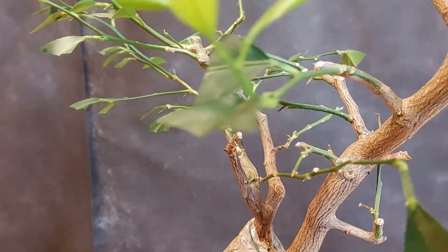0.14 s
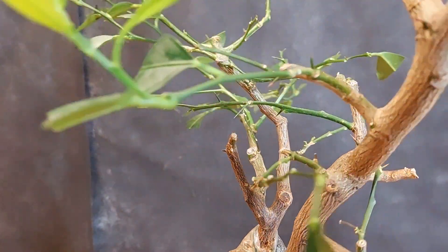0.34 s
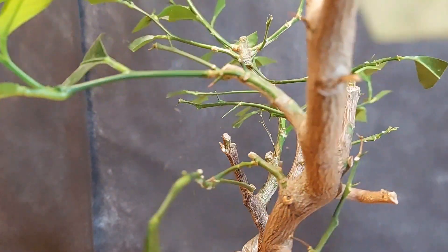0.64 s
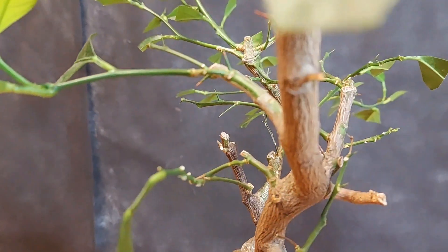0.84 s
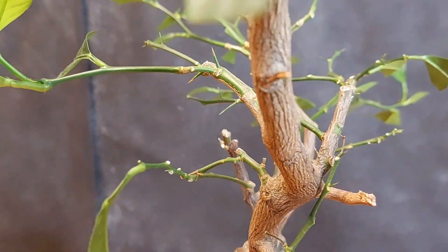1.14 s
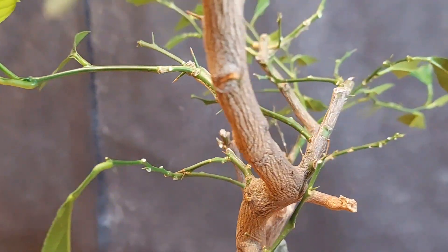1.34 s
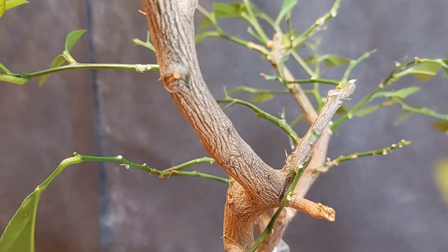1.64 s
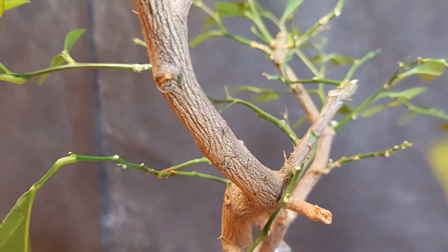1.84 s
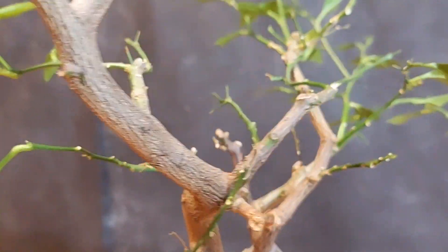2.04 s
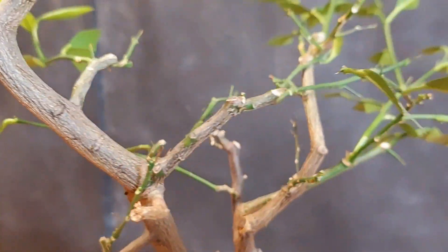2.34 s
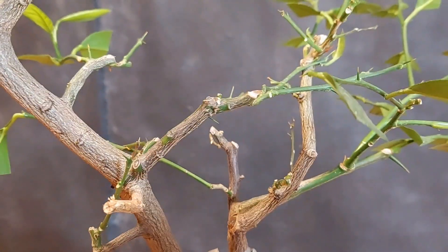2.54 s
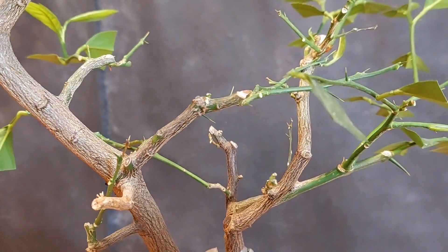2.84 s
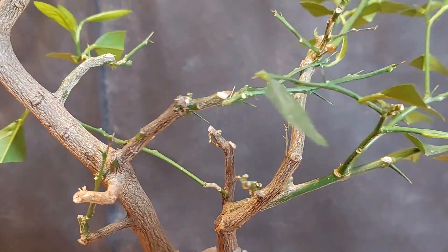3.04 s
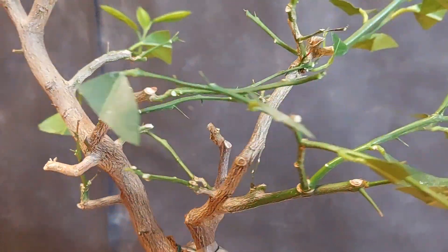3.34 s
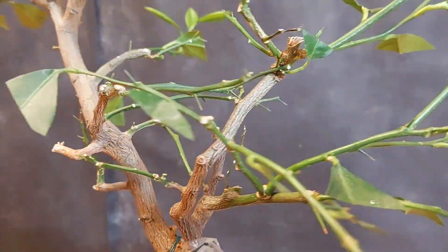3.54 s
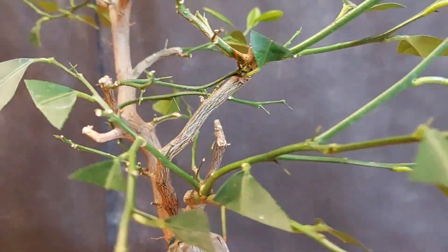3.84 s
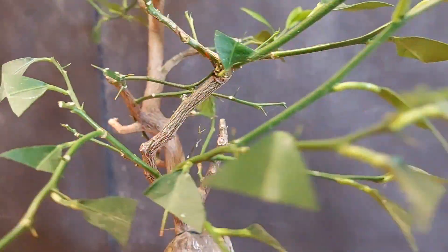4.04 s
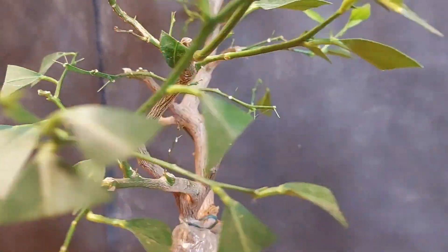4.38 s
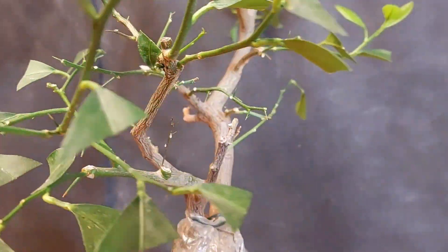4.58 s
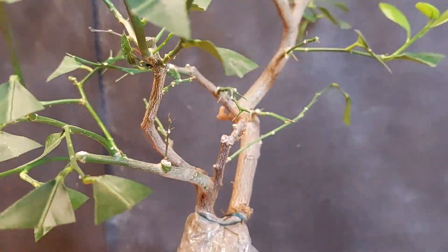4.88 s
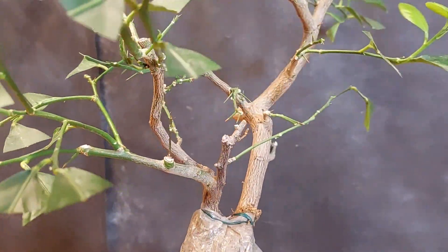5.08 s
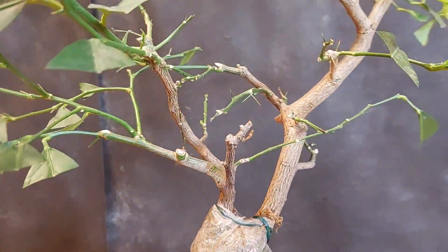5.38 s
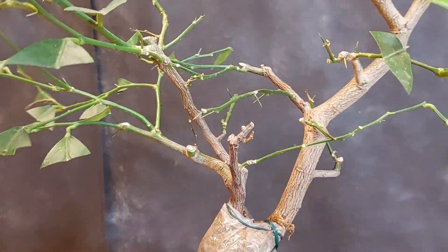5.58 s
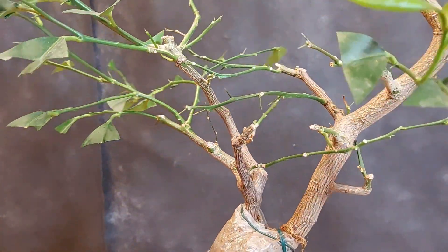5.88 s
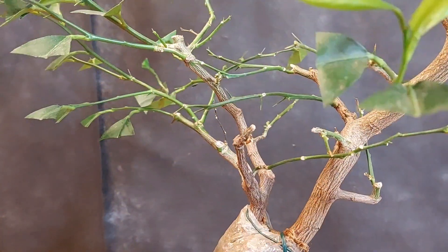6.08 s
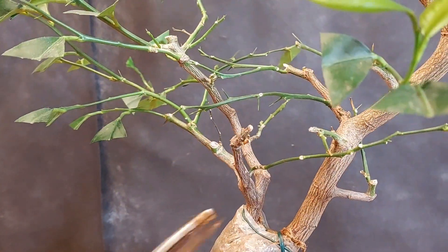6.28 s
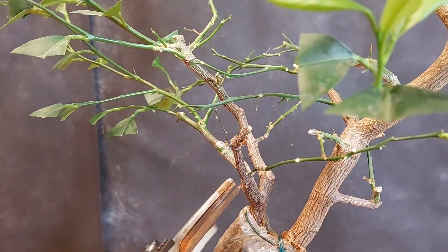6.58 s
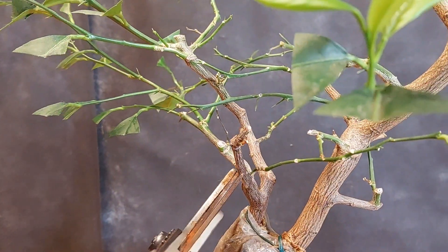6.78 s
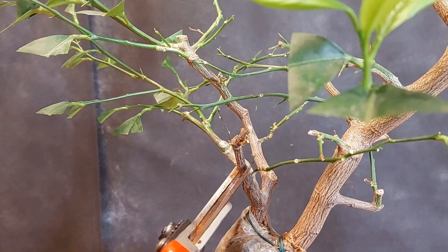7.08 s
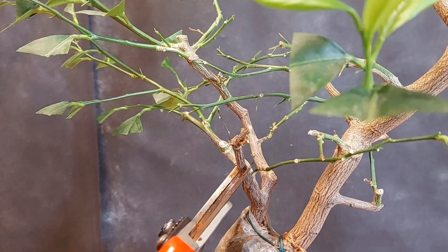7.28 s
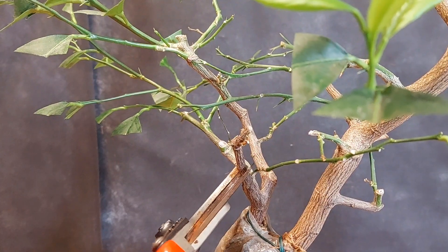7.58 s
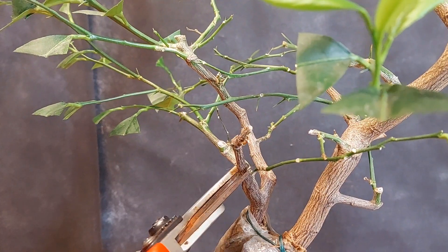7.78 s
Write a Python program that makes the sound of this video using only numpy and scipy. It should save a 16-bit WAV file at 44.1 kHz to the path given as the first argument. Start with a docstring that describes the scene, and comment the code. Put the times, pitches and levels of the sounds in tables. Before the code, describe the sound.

Close stereo microphone in a quiet, faintly hissing room. A small potted tree is turned by hand: dry leaf rustles and tiny ticks, then a sudden loud twig bump and scrape on the left. Sparse rustling follows, a tool knocks the table with a short woody clatter, and shears click open with a thin high ring. It ends on hiss and a faint low rumble.

```python
"""In a quiet room, close to a two-port microphone, a small potted tree is turned by hand.
Leaves and hand brush past as clumped, filtered noise; leaf edges and thorns tick as millisecond bursts.
A twig strikes and scrapes the left port, shaking the microphone body, and a tool knocks on the table,
ringing its modes. The latch of pruning shears snaps open with a thin steel ring of beating sines.
Behind them lie hiss and room tone, a throbbing hum and a passing rumble of resonant noise."""
import sys
import numpy as np
from scipy import signal
from scipy.fft import rfft, irfft
from scipy.io import wavfile
from scipy.ndimage import uniform_filter1d

SR = 44100
rng = np.random.default_rng(int(sys.argv[2]) if len(sys.argv) > 2 else 0)


def file_out(sig):
    """Save sig as 16-bit WAV at sys.argv[1]."""
    # one column per channel
    cols = np.atleast_2d(sig).T
    # limit, then scale
    lim = np.clip(cols, -1, 1)
    pcm = np.round(lim * 32767).astype(np.int16)
    wavfile.write(sys.argv[1], SR, pcm)


N = 349253


def amp(db):
    """Decibel law: a level in dB becomes an amplitude ratio."""
    return 10 ** (np.asarray(db) / 20)


def evened(x):
    """Power normalization: scales to unit root mean square."""
    return x / np.sqrt(np.mean(x ** 2) + 1e-20)


def smoothed(x, width):
    """Low-pass averaging: two running means in a row leave a slow random drift of unit power."""
    return evened(uniform_filter1d(uniform_filter1d(x, width), width))


def read(points, hz):
    """Logarithmic frequency scale: interpolates (frequency, value) points along it."""
    f, value = np.transpose(points)
    return np.interp(np.log(hz + 1), np.log(f + 1), value)


def sides(pan_db):
    """Interchannel level difference: left and right gains whose mean power is one."""
    left = amp(pan_db)
    return np.array([left, np.ones_like(left)]) * np.sqrt(2 / (1 + left ** 2))


def add(mix, s, sound):
    """Superposition: adds a two-channel sound from time s on, cut at the end."""
    part = mix[:, round(s * SR):][:, :sound.shape[1]]
    part += sound[:, :part.shape[1]]


def colour(x, points, tilt_db=0, peak_hz=5000, peak_db=0):
    """Spectral filtering: a curve, a tilt in dB per octave about 5 kHz and one broad peak."""
    hz = np.fft.rfftfreq(x.shape[-1], 1 / SR) + 1
    octaves_off_peak = np.log2(hz / peak_hz)
    peak = peak_db * np.exp(-(octaves_off_peak / 0.37) ** 2)
    gain_db = read(points, hz) + tilt_db * np.log2(hz / 5000) + peak
    return irfft(rfft(x) * amp(gain_db), x.shape[-1])


def band(x, lo_hz, hi_hz):
    """Band-pass filtering: keeps one frequency range, at unit power."""
    sos = signal.butter(4, [lo_hz, hi_hz], "band", fs=SR, output="sos")
    return evened(signal.sosfilt(sos, x))


def resonate(x, hz, width):
    """Damped resonance: a two-pole resonator of given bandwidth in Hz, at unit power."""
    r = np.exp(-np.pi * width / SR)
    return evened(signal.lfilter([1], [1, -2 * r * np.cos(2 * np.pi * hz / SR), r * r], x))


def rings(modes, seconds, phase=0):
    """Modal superposition: sines that each die by 60 dB in their t60; phase in cycles."""
    hz, db, t60 = np.transpose(modes)[:, :, None]
    t = np.arange(round(seconds * SR)) / SR
    decay = amp(db - 60 * t / t60)
    return (decay * np.sin(2 * np.pi * (hz * t + phase))).sum(0)


def swell(rise, fall):
    """Envelope of growth and decay: a bell-shaped rise, then 20 dB lost per fall time."""
    t = np.arange(-3 * rise, 3 * fall, 1 / SR)  # the peak comes at three rise times
    return np.where(t < 0, np.exp(-2 * (t / rise) ** 2), amp(-20 * t / fall))


# spectrum of hiss and room tone: (frequency [Hz], relative level [dB per Hz])
AIR_SPECTRUM = [(13, -55.5), (22, -20.5), (80, -5), (95, -9), (115, -20.5), (223, -25), (387, -30),
                (420, -37), (482, -27), (524, -35), (690, -36.5), (2820, -49), (16000, -49.5)]
AIR_DB = -65.5  # overall level
# balance of the two ports: (frequency [Hz], left-right [dB])
AIR_BALANCE = [(60, 5.5), (240, 5), (950, 3.5), (3770, 0.5), (15000, -0.5)]


def air():
    """Uncorrelated noise: microphone hiss and room tone are unrelated in the two ports."""
    hz = np.fft.rfftfreq(N, 1 / SR)
    noise = evened(colour(rng.standard_normal((2, N)), AIR_SPECTRUM))
    return amp(AIR_DB) * irfft(rfft(noise) * sides(read(AIR_BALANCE, hz)), N)


# swells of low hum: (time of peak [s], level [dB])
HUM_SWELLS = [(.32, -59.5), (0.552, -58), (0.761, -52.5), (1.0, -57), (1.51, -50), (2.0, -52.5),
              (2.969, -56.5), (3.278, -63.5), (3.901, -59.5)]
HUM_HZ, HUM_RISE_S, HUM_FALL_S, HUM_PAN_DB = 78.6, 0.085, .09, 4.5


def hum():
    """Amplitude and frequency modulation: a low sine of wavering pitch throbs in separate swells."""
    out = np.zeros((2, N))
    waver = 1 + 0.054 * smoothed(rng.standard_normal(N), 3000)  # frequency ratio
    shape = swell(HUM_RISE_S, HUM_FALL_S)
    for s, db in HUM_SWELLS:
        start = s - 3 * HUM_RISE_S
        cycles = HUM_HZ * np.cumsum(waver[round(start * SR):][:len(shape)]) / SR
        add(out, start, amp(db) * shape * np.sin(2 * np.pi * cycles) * sides(HUM_PAN_DB)[:, None])
    return out


# resonances of the rumble: (frequency [Hz], width of the first of two resonators [Hz], relative level [dB])
RUMBLE_RESONANCES = [(158, 26, 0.5), (231, 46, 1.5), (285, 67, -4)]
# course of the rumble before its surges: (time [s], level [dB])
RUMBLE_COURSE = [(4.5, -81), (5.0, -70), (6.3, -70), (6.85, -62.5), (7.92, -71.5)]
SURGE_DB, SURGE_S = 2.5, .06  # rms depth, averaging time


def rumble():
    """Resonance under random excitation: partly shared noise through low resonators passes in surges."""
    noise = rng.standard_normal((3, N))
    ports = noise[:2] + 0.24 * noise[2]
    roar = np.zeros((2, N))
    for hz, width, db in RUMBLE_RESONANCES:
        roar += amp(db) * resonate(resonate(ports, hz, width), hz, 2 * width)
    surge = smoothed(rng.standard_normal(N), round(SURGE_S * SR))
    level_db = np.interp(np.arange(N) / SR, *np.transpose(RUMBLE_COURSE)) + SURGE_DB * surge
    return amp(level_db) * evened(roar) * sides(3.8)[:, None]


# a tool meets the table: (time [s], level [dB], left-right [dB], hardness tilt [dB per octave],
# hollow ring [dB], strongest frequency [Hz])
TOOL_KNOCKS = [(5.4046, -43, 5, -2.5, -40, 2170), (5.5994, -24.5, 4, 3, -21, 1600),
               (5.606, -25.5, 5, -1.7, -4.5, 1490), (5.617, -32, -16, 1.5, -1.5, 1280),
               (5.752, -55, 3.5, -12, 6.5, 700), (5.764, -49.5, 3, -8, 6.5, 700),
               (5.775, -54, -2.5, -1, -5, 1200)]
# table modes that stand out: (frequency [Hz], relative level [dB], t60 [s])
TABLE_MODES = [(282, -10, 0.098), (422, 7.5, 0.12), (537, 2, 0.039), (620, 11, 0.049), (1044, -1, 0.095),
               (1537, -14.5, 0.11)]
# table modes too dense to tell apart: (frequency [Hz], relative level [dB per Hz])
CLACK_SPECTRUM = [(500, -8), (900, -4.5), (1600, 0), (2300, -9), (3000, -10), (4200, -11), (5300, -17),
                  (6200, -46)]
CLACK_T60 = 0.21  # s


def knocks():
    """Modal density: chatter rings a few separate modes over a noisy clack of dense ones."""
    out, t = np.zeros((2, N)), np.arange(16384) / SR
    ring = rings(TABLE_MODES, .3)[None]
    for s, db, pan_db, hard_db, hollow_db, peak_hz in TOOL_KNOCKS:
        noise = rng.standard_normal((3, len(t)))
        shared = noise[:2] + .5 * noise[2]
        clack = evened(colour(shared, CLACK_SPECTRUM, hard_db, peak_hz, peak_db=10.0))
        clack *= amp(-60 * t / CLACK_T60) + 0.92 * np.exp(-t / 0.0093)
        chatter = shared * np.exp(-t / 0.016)
        chatter /= np.linalg.norm(chatter[0])
        hollow = signal.fftconvolve(chatter, ring, axes=1)[:, :len(t)]
        add(out, s, amp(db) * (clack + amp(hollow_db) * hollow) / 3 * sides(pan_db)[:, None])
    return out


# pushes on the microphone: (time [s], level [dB], left-right [dB], contact time [s])
PUSHES = [(.744, -38, -10, .002), (1.0125, -46, -5, .002), (1.528, -54, 3, .0012), (1.537, -50, 3, .0008),
          (2.1248, -28, 18, .0006), (2.1369, -12, 38, .0005), (2.1376, -9, 38, .0005),
          (2.1405, -11, 38, .0018), (2.1441, -10, 38, .0006), (2.1447, -11, 38, .0044),
          (3.845, -55, 1.5, .0012), (5.46, -58, 5, .02), (5.6, -48, 1.5, .003), (6.11, -51, 9, .004)]
# modes of the microphone body: (frequency [Hz], relative level [dB], t60 [s])
BODY_MODES = [(59.09, -16, 0.044), (91, -5, 0.11), (133, -4.5, .08), (281, -3.5, 0.052), (1610, 1, 0.0044),
              (3250, 12, 0.022)]
PRESS_S = .0019  # longer contacts press the capsule in, shorter ones flick it out


def jolts():
    """Impulse response: each push on the capsule is heard directly and shakes the body's modes."""
    out = np.zeros((2, N))
    response = rings(BODY_MODES, .3, phase=.2) * 330 / SR
    response[0] += 1  # the push itself
    for s, db, pan_db, contact in PUSHES:
        push = np.hanning(max(round(contact * SR), 3) + 2)
        direction = np.sign(contact - PRESS_S)
        add(out, s, direction * amp(db) * np.convolve(push, response) * sides(pan_db)[:, None])
    return out


# spectrum of a tick, snap or scrape: (frequency [Hz], relative level [dB per Hz])
TICK_SPECTRUM = [(300, -40.5), (1500, -9), (4000, -6.5), (7500, -1), (10000, -6.5), (13000, -1.5),
                 (16000, -10.5)]
SCRAPE_S, SCRAPE_DB, SCRAPE_HOLD_S, SCRAPE_FADE_S = 2.1453, -23.5, 0.003, 0.006  # 20 dB per fade time


def scrape():
    """Friction noise: a twig hisses across the left port, holds briefly and fades."""
    out = np.zeros((2, N))
    t = np.arange(0, SCRAPE_HOLD_S + 2 * SCRAPE_FADE_S, 1 / SR)
    hiss = evened(colour(rng.standard_normal((2, len(t))), TICK_SPECTRUM, -0.54))
    fade_db = 20 * np.maximum(t - SCRAPE_HOLD_S, 0) / SCRAPE_FADE_S
    add(out, SCRAPE_S, amp(SCRAPE_DB - fade_db) * hiss * sides(24.)[:, None])
    return out


TICK_S = .0009  # decay time constant
ROOM_DB, ROOM_T60 = -21.5, 0.018  # near reflections: level, t60 in s


def snap(peak_hz):
    """Impulsive release: a millisecond burst, its peak one, differing by port, and near reflections."""
    noise = rng.standard_normal((3, 4096))
    t = np.arange(noise.shape[1]) / SR
    shared = colour(noise[:2] + 0.57 * noise[2], TICK_SPECTRUM, peak_hz=peak_hz, peak_db=10)
    burst = shared * np.exp(-t / TICK_S) * (1 - np.exp(-t / 0.000083))
    tail = shared * amp(ROOM_DB - 60 * t / ROOM_T60) * (1 - np.exp(-t / 0.003))
    return (burst + tail) / abs(burst).max()


# steel of the shears: (frequency [Hz], level [dB], t60 [s])
STEEL_MODES = [(11840, -31, .1), (11940, -38, .12), (11780, -39, .12), (12290, -46, .1)]
LATCH_S, LATCH_DB = 6.1213, -19


def latch():
    """Beating of close modes: the latch snaps open and the steel rings thinly."""
    out = np.zeros((2, N))
    add(out, LATCH_S, amp(LATCH_DB) * snap(12300))
    left = rings(STEEL_MODES, .25)
    right = amp(-1.5) * rings(STEEL_MODES, .25, phase=0.21)
    add(out, LATCH_S, np.array([left, right]))
    return out


# leaf edges and thorns: (time [s], level [dB], left-right [dB], strongest frequency [Hz])
LEAF_TICKS = [(0.6757, -40.5, -12, 8460), (0.7342, -36, -5, 4870), (0.7439, -38, -26, 5270),
              (0.7546, -25.5, -3, 3740), (0.7933, -30.5, 1, 7900), (0.821, -46, -9, 5680),
              (1.012, -32.5, -15, 4940), (1.02, -40.5, -17, 2850), (1.5555, -44.5, 5, 8000),
              (1.59, -46, -23, 13600), (2.1249, -27.5, -8, 2628), (3.5534, -45, -1, 4995),
              (3.5682, -41, 6, 4850), (3.6297, -48, 6, 7400), (3.8559, -32, -4.5, 8000),
              (3.8735, -35, -6, 5700), (4.998, -31.5, -5, 6260), (5.1993, -44.5, 11.5, 7550),
              (5.413, -44.5, 5, 2220), (5.445, -44.5, -3, 2010), (5.551, -43, 2, 7200),
              (5.9339, -41, 0, 7300), (5.9653, -35.5, -5, 5080), (6.108, -38, 8, 11800),
              (6.1395, -31.5, 8, 11800), (6.2592, -35.5, 19.5, 6540), (6.3091, -40, 5, 8150),
              (6.329, -42, 15, 7560), (6.466, -40, 5, 5360)]


def ticks():
    """Stick-slip release: leaf edges and thorns catch and let go, one short burst each."""
    out = np.zeros((2, N))
    for s, db, pan_db, peak_hz in LEAF_TICKS:
        add(out, s, amp(db) * snap(peak_hz) * sides(pan_db)[:, None])
    return out


# leaves and hand brushing past: (time of swell peak [s], level [dB],
# brightness from dull rub to fizz [dB], fall time by 20 dB [s], strongest frequency [Hz])
BRUSH_STROKES = [(0.577, -81.5, 11, .039, 5500), (0.631, -71.5, 2.5, 0.052, 11200),
                 (0.674, -69, -5, 0.049, 4170), (0.721, -67, -11, 0.06, 700),
                 (0.751, -52.5, -6.5, .028, 3700), (0.791, -59.5, 0, .017, 2120),
                 (0.82, -60, -13.5, 0.029, 3000), (1.019, -59, -12, 0.036, 725),
                 (1.165, -79.5, 12, 0.061, 6300), (1.537, -67, -15.5, 0.076, 645),
                 (1.598, -70, 1, 0.019, 11000), (2.136, -38.5, -21, 0.029, 3040),
                 (2.142, -51, -15, 0.018, 2580), (2.517, -71, 8, .06, 4830), (2.995, -65, -1, 0.056, 1300),
                 (3.086, -90, 16, 0.043, 7000), (3.38, -86.5, 23.5, 0.095, 7900),
                 (3.527, -76, 7, .033, 5370), (3.574, -66.5, 5, 0.085, 4930),
                 (3.634, -66.5, 12, 0.021, 7300), (3.784, -87.5, 20, 0.066, 7460),
                 (3.856, -69.5, -4, 0.043, 900), (3.873, -64, 0, 0.039, 2200),
                 (3.967, -84.5, 23, 0.032, 8500), (4.19, -90.5, 20.5, 0.053, 8150),
                 (4.61, -82, 10, .1, 5000), (4.692, -61.5, -5.5, 0.18, 1680), (4.772, -57, 8, 0.07, 1400),
                 (4.955, -61.5, -3, .11, 7300), (5.004, -57.5, -2, 0.048, 1180),
                 (5.097, -87.5, 28, 0.097, 7900), (5.19, -70.5, -2.5, 0.16, 2050),
                 (5.274, -79, 6, 0.22, 7600), (5.43, -66.5, -20, 0.079, 1900),
                 (5.511, -67, -4.5, 0.15, 2500), (5.629, -50, -17, 0.064, 3740),
                 (5.772, -68.5, -8, 0.083, 1200), (5.93, -66, 0.5, 0.08, 3920),
                 (5.973, -71, -2, 0.085, 4480), (6.09, -69, 3, 0.036, 4200),
                 (6.114, -50.5, 23.5, 0.028, 4200), (6.138, -58.5, 13.5, 0.067, 2400),
                 (6.26, -68.5, 10, 0.061, 4190), (6.327, -69.5, 0, 0.14, 3800), (6.461, -72.5, 4, .1, 4670),
                 (6.502, -82.5, -13, 0.16, 650), (7.888, -82.5, -6, 0.19, 8700)]
# spectrum of leaf slips: (frequency [Hz], relative level [dB per Hz])
LEAF_SPECTRUM = [(1650, -35.5), (2800, -13.5), (3150, -12.5), (5520, -6.5), (7120, -3), (9400, -14.5),
                 (10600, -13), (14800, -12), (16000, -14)]
# spectrum of the dull rub: (frequency [Hz], relative level [dB per Hz])
RUB_SPECTRUM = [(350, -4.5), (700, -2), (1200, -4), (2000, -2), (2800, -4)]
# where the brushing is: (time [s], left-right [dB])
BRUSH_PLACE = [(.58, -18), (.8, 0.5), (1.998, 3), (2.13, 15), (2.2, 1), (3.701, 0.5), (4.0, 2), (6.201, 2),
               (6.549, 8)]
RISE_S, RISE_SHARE = 0.0045, 0.33  # a brush rises in this time plus this share of its fall time
FIZZ_DB, RUB_DB, FIZZ_SHARE = 1.5, -2, 0.45  # brightness lifts fizz by this share, lowers rub by the rest
BRUSH_PEAK_DB = 6  # how far the strongest pitch of a brush stands out


def brushes():
    """Friction as many small slips: slips of uneven size, in clumps, fill one swell per brush."""
    clumps = amp(2.0 * evened(uniform_filter1d(rng.standard_normal(N), size=180)))
    slips = rng.standard_normal((2, N)) * amp(1.5 * rng.exponential(1, N)) * clumps
    leaf = colour(slips, LEAF_SPECTRUM)
    swish = band(leaf, 2600, 6000)
    fizz = band(leaf, 7100, 16500)
    rub = band(colour(slips, RUB_SPECTRUM), 300, 2400)
    out = np.zeros((2, N))
    for s, db, bright_db, length, peak_hz in BRUSH_STROKES:
        rise = RISE_S + RISE_SHARE * length
        shape, start = amp(db) * swell(rise, length), s - 3 * rise
        first = round(start * SR)
        span = np.s_[:, first:first + len(shape)]
        mix = swish[span] + amp(FIZZ_DB + FIZZ_SHARE * bright_db) * fizz[span]
        mix += amp(RUB_DB - (1 - FIZZ_SHARE) * bright_db) * rub[span]
        mix = colour(mix, [(1, 0.00054)], peak_hz=peak_hz, peak_db=BRUSH_PEAK_DB)  # all but flat below the peak
        add(out, start, mix * shape[:mix.shape[1]])
    return out * sides(np.interp(np.arange(N) / SR, *np.transpose(BRUSH_PLACE)))


def scene():
    """Linear superposition: the sound pressures of all sources add."""
    background = air() + hum() + rumble()
    return background + knocks() + jolts() + scrape() + latch() + ticks() + brushes()


EDGE_HZ = 15800  # upper band limit


def record(dry):
    """Transducer bandwidth: bass roll-off of the small capsules, then the band limit."""
    thin = signal.sosfilt(signal.butter(2, 38, "high", fs=SR, output="sos"), dry)
    low_pass = signal.firwin(511, EDGE_HZ, window=("kaiser", 9), fs=SR)
    return signal.oaconvolve(thin, low_pass[None], "same")


dry = scene()
out = record(dry)
file_out(out)
```